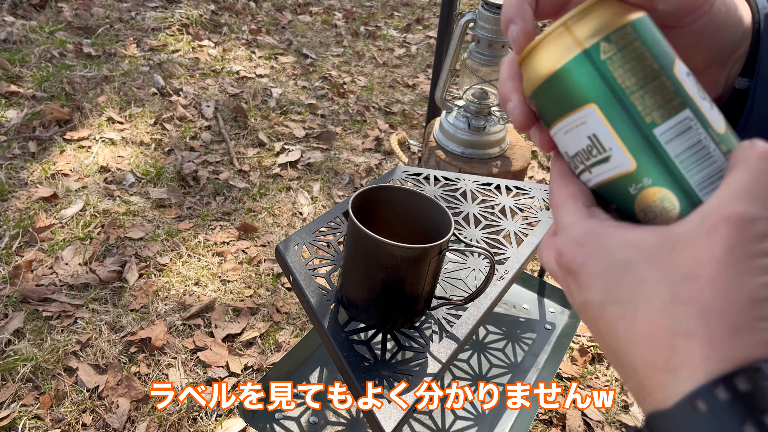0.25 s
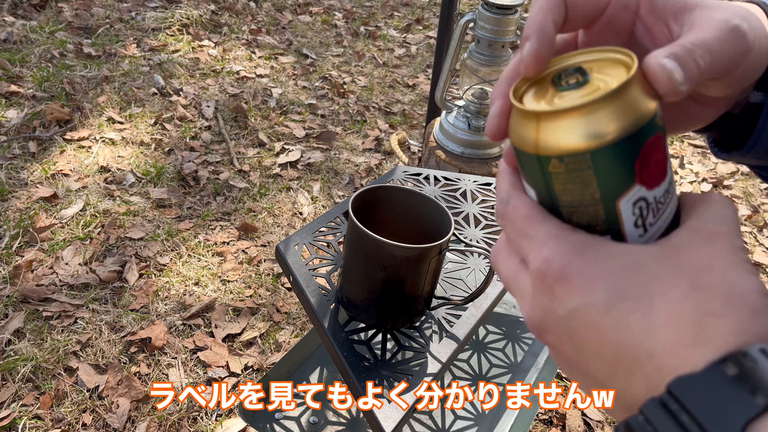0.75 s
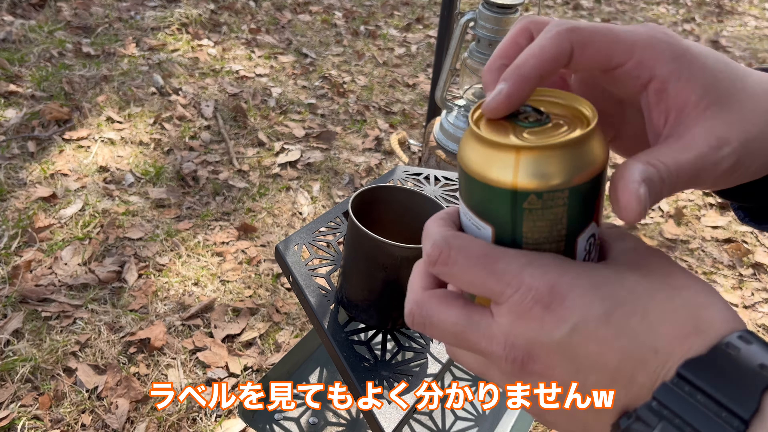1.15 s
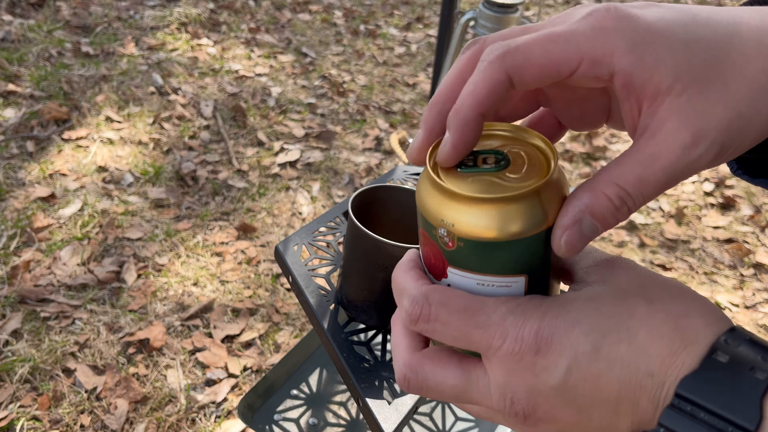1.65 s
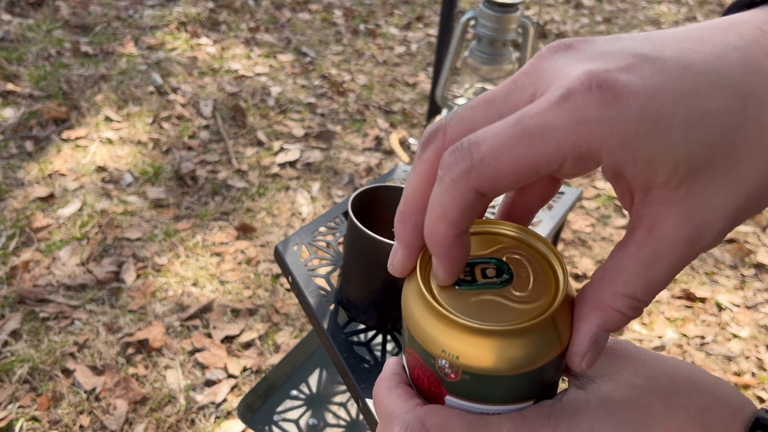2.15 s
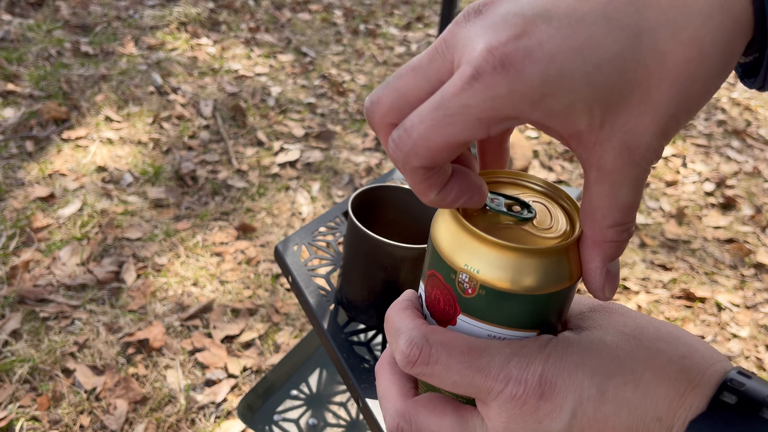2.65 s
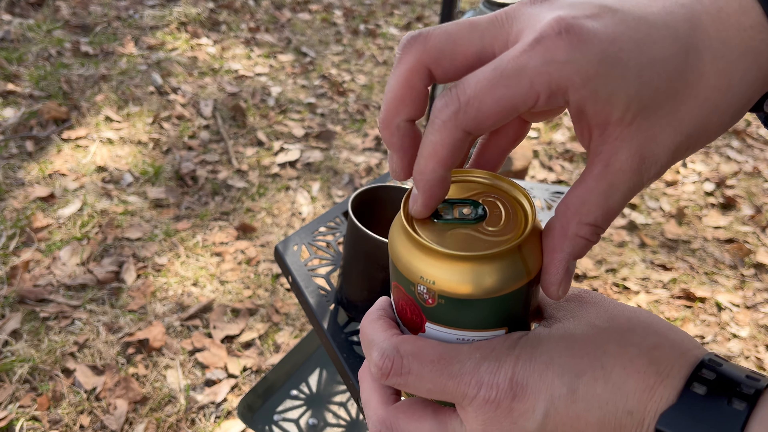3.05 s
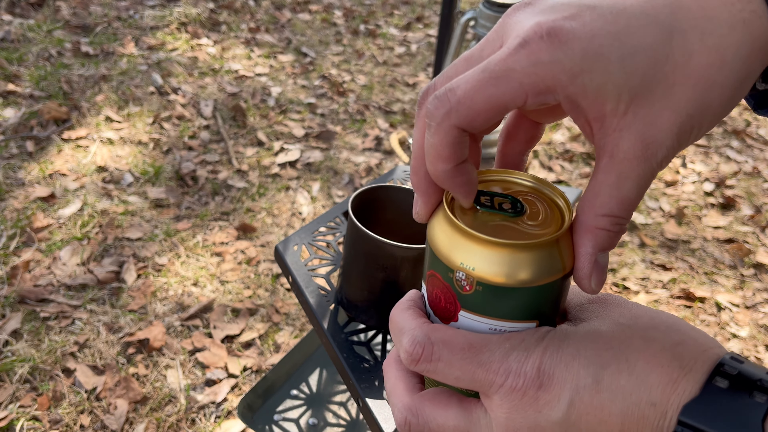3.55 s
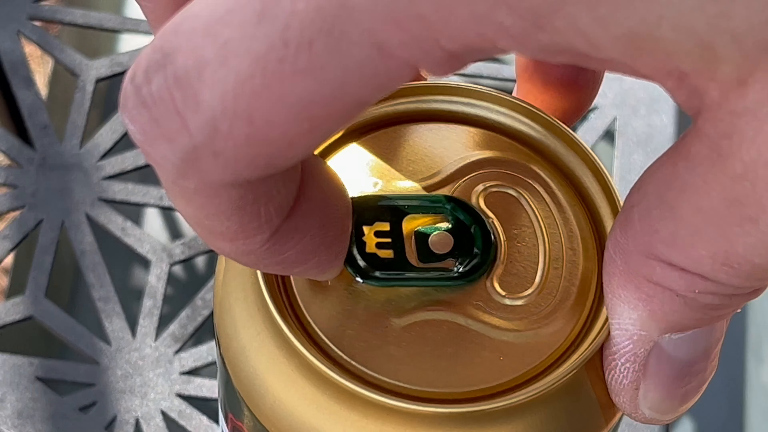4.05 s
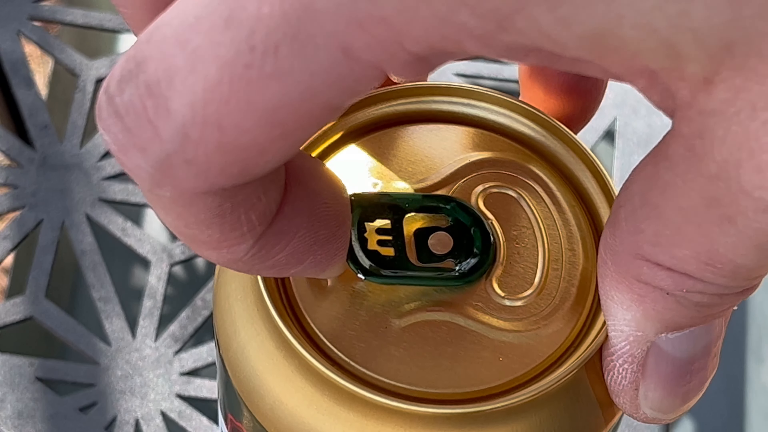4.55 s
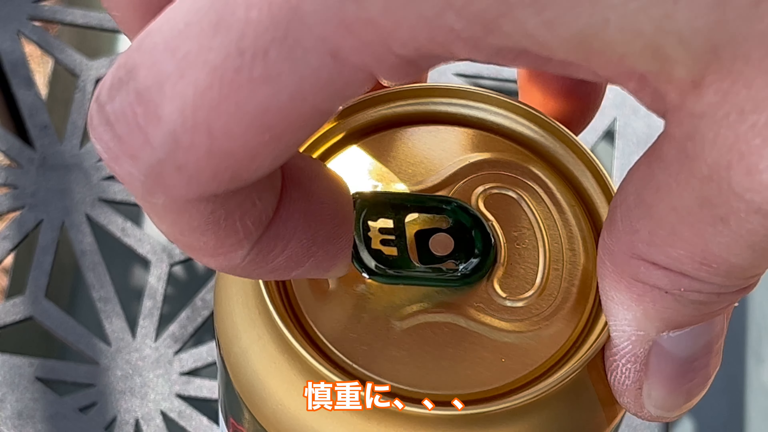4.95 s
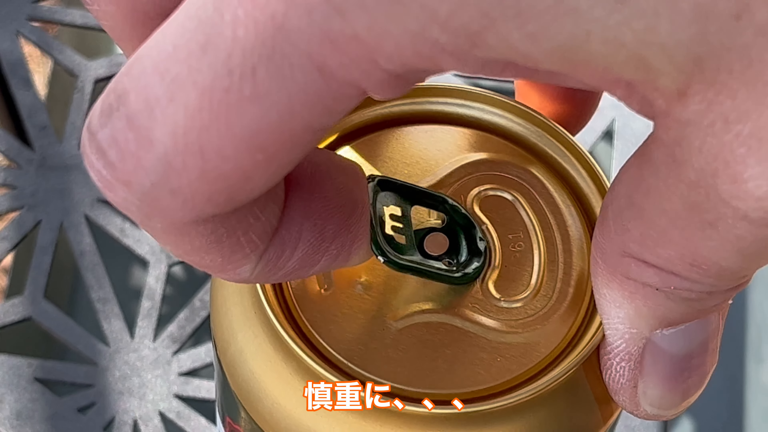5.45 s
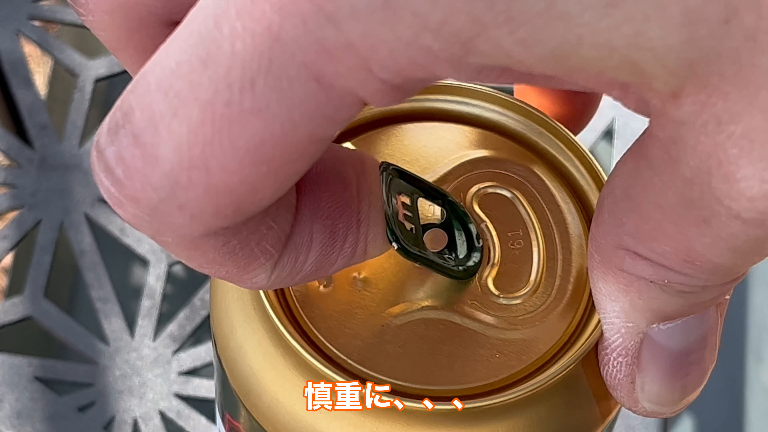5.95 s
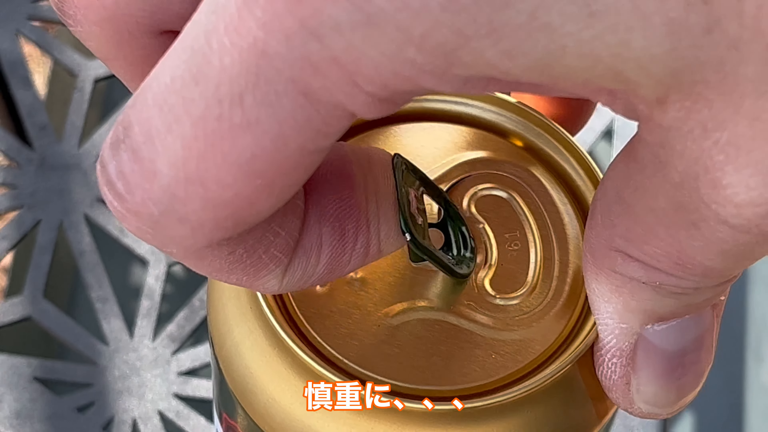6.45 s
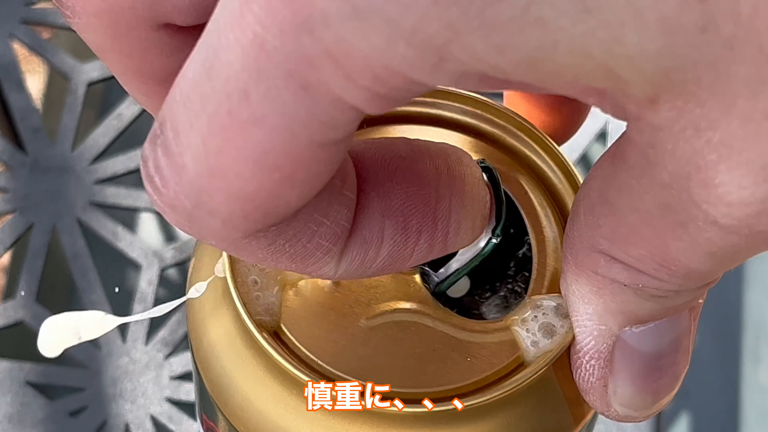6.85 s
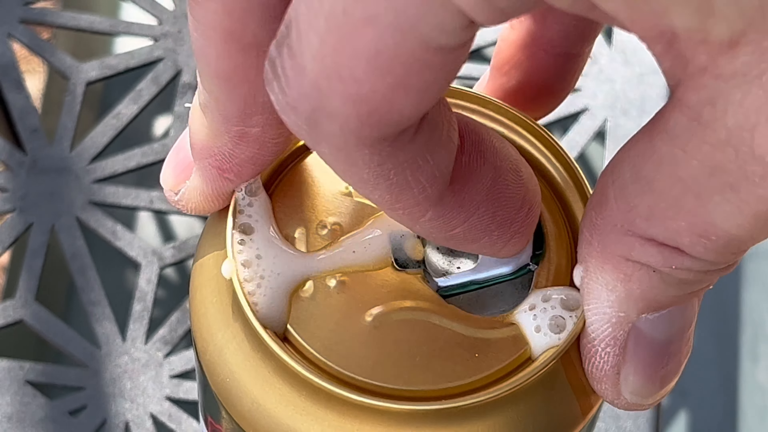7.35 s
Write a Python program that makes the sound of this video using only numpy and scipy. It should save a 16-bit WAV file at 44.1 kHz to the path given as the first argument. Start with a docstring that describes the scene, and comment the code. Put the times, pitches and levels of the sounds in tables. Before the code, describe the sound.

Quiet handling of a full drinks can: dry bright finger wipes, small scrapes, light tab ticks and thin cloth squeaks, over soft low air rumble and a barely audible leaf hiss. After a pause comes a hard metallic crack and very short bright hiss, small bubbly gulps, then a double snap tearing the lid open with a pop of gas. Wet fizz and little gurgles fade. Close stereo microphone, dry open air.

```python
"""The lid of a beer can cracks and tears in three snaps: struck metal modes, a buckling panel and a pop of gas.
Gas escapes as sputtering noise; bubbles and foam excite the air in the neck; the thin wall rings on.
Beforehand a nail ticks at the lid and tab. Fingers rub and scrape the can by stick and slip.
A sleeve swishes and squeaks as gliding narrow bands of noise.
Behind lie soft buffets of air, a low outdoor rumble and a faint hiss of leaves, all shaped noise or slow tones."""
import sys
import numpy as np
from scipy import signal
from scipy.fft import rfft, irfft, next_fast_len
from scipy.io import wavfile
from scipy.ndimage import uniform_filter1d, minimum_filter1d

SR = 44100
rng = np.random.default_rng(int(sys.argv[2]) if len(sys.argv) > 2 else 0)


def dump(signal):
    """Clip the signal to [-1, 1] and save it as 16-bit WAV at the path in sys.argv[1]."""
    limited = np.clip(np.atleast_2d(signal).T, -1, 1)
    pcm = np.round(limited * 32767).astype(np.int16)
    wavfile.write(sys.argv[1], SR, pcm)


N = 356769
T = np.arange(N) / SR  # time, s
TOP_HZ = 15900  # upper edge of the whole sound

# Skin and sleeve slide over the can: start_s, end_s, level_db, top_db
SLIDES = [(0, 0.207, -74, -72), (0.35, 0.817, -79, -69), (0.87, 1.164, -65, -61.5), (1.14, 1.56, -68, -65),
          (1.52, 2.253, -67, -73), (1.93, 1.992, -73, -82), (2.18, 2.544, -64.5, -71.5),
          (2.774, 2.862, -61, -66), (2.58, 2.72, -81, -86), (2.877, 3, -68, -71),
          (2.99, 3.463, -83.5, -87.5), (3.658, 3.76, -70.5, -72), (4.01, 4.099, -71.5, -76.5),
          (4.975, 5.073, -68, -77), (6.97, 7.118, -68, -76), (7.479, 7.59, -73.5, -79.5),
          (7.774, 7.873, -76.5, -84)]
SLIDE_ATTACK_S, SLIDE_SAG_DB_PER_S, SLIDE_RELEASE_T60_S = 0.091, 2, 0.26
GRIP_DB = -86.5  # the holding hands never lie quite still
# Quick bright wipes of the fingers as they turn the can: time_s, level_db
WIPES = [(.165, -60.5), (.262, -60), (.356, -60.5), (.456, -58), (.637, -55), (.727, -55.5), (.785, -56.5),
         (1.24, -54.5), (1.285, -58), (2.31, -61.5)]
WIPE_RISE_S, WIPE_FALL_S = 0.0124, .026  # Gaussian spreads: a wipe catches quickly and trails off
WIPE_BODY_DB = -15.5  # its body against its top
# Colour of the body of the rubbing: frequency_hz, gain_db
RUB_BODY = [(300, 8), (700, -1), (1200, -2.5), (2500, -0.5), (4000, -0.5), (6000, -2), (8000, -3),
            (10000, -20), (16000, -34.5)]
# Colour of the top of the rubbing: frequency_hz, gain_db
RUB_TOP = [(5000, -24), (8000, -6), (9500, -1.5), (11000, -4), (13000, -6), (15000, -9.5), (16000, -21)]
# Resonances of the gripped wall: frequency_hz, width_hz, relative_db
RUB_MODES = [(1150, 88, -5), (1480, 42, -5), (2230, 170, -7), (2750, 300, -8), (3550, 190, -5),
             (4840, 400, -4.5), (5760, 400, -3.5)]

# Spectrum of the outdoor rumble: frequency_hz, gain_db
AIR = [(15, -46), (25, -18), (43, 0.5), (97, 4), (136, -8), (251, -25), (281, -26.5), (375, -39.5),
       (409, -33), (452, -43.5), (500, -36.5), (650, -67), (1100, -120)]
# Slow drift of the outdoor level: time_s, level_db
AIR_LEVEL = [(0, -57.5), (2, -55.5), (3.6, -58.5), (4.9, -55.5), (5.5, -62), (6.1, -60), (7.7, -57.5),
             (8.09, -58.5)]
# Spectrum of the leaves: frequency_hz, gain_db
LEAVES = [(150, -3.5), (250, 14.5), (500, 8), (1000, 3.5), (2000, 1), (4000, -12.5), (7000, -34),
          (12000, -31), (15000, -15)]
# The rumble dips by as much as a snap exceeds this level, then returns
DIP_FROM_DB, DIP_RECOVERY_DB_PER_S = -17.5, 24.5

# A fingertip catches and scrapes, ringing the spot it touches: centre_s, half_length_s, level_db, pitch_hz
SCRAPES = [(1.075, 0.068, -70, 1140), (1.272, 0.051, -65, 6100), (1.402, 0.032, -70.5, 5800),
           (1.615, 0.015, -70, 4200), (1.72, 0.034, -73, 2480), (1.87, .012, -69, 2400),
           (1.978, .013, -66, 1970), (1.98, .012, -67, 3700), (1.99, .024, -64, 2680),
           (2.163, 0.012, -63, 3260), (2.24, 0.095, -69.5, 2580), (2.362, 0.1, -75.5, 1200),
           (2.46, .04, -71.5, 2700), (2.849, 0.0092, -54, 2570), (3.484, 0.015, -76, 2450),
           (3.486, 0.0093, -74.5, 6240), (3.76, 0.023, -73, 2500), (4.097, .025, -85, 2400),
           (7.58, 0.032, -75, 2640), (7.86, 0.023, -72.5, 2850), (7.95, 0.03, -81, 2850),
           (8.069, .02, -78.5, 2930)]
SCRAPE_WIDTH_HZ = 720  # of the first of two resonators

# The sleeve swishes: centre_s, half_length_s, level_db
SWISHES = [(1.08, .12, -72), (1.72, .17, -73), (2.2, .1, -71), (2.46, .085, -70), (2.95, .15, -80)]
# Colour of the cloth: frequency_hz, gain_db
SWISH_COLOUR = [(120, -6), (300, 2), (700, 0), (1400, 0), (2000, -9), (4000, -12), (7000, -17),
                (12000, -32)]
SWISH_LAG_S = .00036  # the sleeve is well off to one side: the left port hears it later

# Soft buffets of air and hands on the phone: time_s, relative_level_db, centre_pitch_hz
BUFFETS = [(1.579, -46, 80.3), (1.775, -51, 74.6), (4.215, -33.5, 88), (4.25, -47, 75.5),
           (4.424, -46, 57.9), (4.728, -40, 79.6), (4.775, -45.5, 51.9), (5.34, -47.5, 72),
           (5.425, -53.5, 74.9), (5.595, -49, 79.5), (5.634, -50, 61.7), (5.972, -49.5, 85),
           (6.015, -55.5, 180.4), (6.108, -52.5, 80.6), (6.226, -47, 104.5), (6.436, -50, 214.2),
           (7.751, -41, 159.1), (7.765, -46.5, 71.4), (7.82, -49, 54.5)]
BUFFET_CYCLES = 1.13  # cycles in the fall of a buffet: the deeper, the longer
BUFFET_RISE = 0.29  # its rise against its fall

# The sleeve squeaks, one curve for each move of the arm: time_s, pitch_hz, lower_line_db, upper_line_db
SQUEAKS = [
    [(1.84, 5350, -86, -94), (1.92, 5250, -77, -84), (2.02, 5100, -77, -79), (2.15, 4810, -82, -79),
     (2.29, 4950, -78, -88), (2.335, 5360, -68, -81), (2.365, 5450, -66, -80), (2.383, 5170, -68, -82),
     (2.4, 5430, -67, -81), (2.445, 5320, -65, -78), (2.47, 5150, -70, -79), (2.515, 4980, -72, -77),
     (2.54, 5010, -73, -75), (2.63, 4620, -83, -78), (2.69, 4530, -86, -80), (2.72, 4400, -93, -98)],
    [(2.96, 5280, -88, -98), (3.07, 5020, -83, -94), (3.17, 4900, -86, -97), (3.27, 4970, -96, -105)],
    [(3.62, 6700, -94, -120), (3.72, 6880, -87, -120), (3.8, 6500, -94, -120)],
    [(3.87, 6550, -93, -120), (3.95, 6770, -86, -120), (4.01, 7000, -94, -120)],
]
SQUEAK_UPPER_RATIO = 1.2  # pitch of the upper line against the lower
SQUEAK_SECOND_RATIO = 1  # a second strand at the lower pitch that follows the upper line's level
SQUEAK_WIDTH_HZ = 85  # of the first of two resonators

# Nail and tab tick on the lid: time_s, relative_level_db, low_db, treble_db
TICKS = [(1.864, -58.5, 4, -6), (2.155, -57, -21, -3), (2.510, -51, -4, 15), (2.715, -64, 0, -9),
         (2.847, -34, -10, 6), (2.857, -34.5, -3, -7), (2.921, -45, -12, -5), (2.971, -55.5, -3, -10),
         (4.951, -65.5, 4.5, -16.5), (5.327, -68, -7, -8), (5.367, -68, 0, -10), (5.382, -65.5, 3, -10),
         (5.494, -71, -9, -10), (5.603, -69.5, -10, -18), (5.715, -63, -8, -10), (5.727, -46, -12, -13.5),
         (5.8071, -34, -9, -13.5), (5.812, -38, -6, -15), (5.8182, -49, -7, -3), (5.826, -50.5, -7, -4),
         (5.895, -61, -6, -6), (5.902, -53, -7, -6), (5.916, -58.5, -8, -6), (5.937, -53.5, 3, -7),
         (6.099, -50, -5, -2.5), (6.12, -64, -8, 0), (6.215, -65.5, -7.5, 0.5), (6.320, -47, -9, 0),
         (6.385, -50.5, -12, 1.5), (6.392, -44, -12.5, 0.5), (6.405, -37, -6, 0.5), (6.408, -28, -7, -1),
         (6.4205, -43.5, -9, -2), (6.450, -28, -11.5, -5.5), (6.722, -45.5, -11.5, -1.5),
         (6.7493, -42, -4, -14), (6.982, -66, -10, 2), (7.048, -46.5, -10.5, -14), (7.083, -56, -12, -1),
         (7.112, -48.5, -12, 5), (7.165, -64, 8, -2), (7.281, -51.5, -10, 2.5), (7.444, -68, -6, -2),
         (7.469, -53, 2, -9), (8.049, -61.5, -15, -2)]
TICK_T60_S, TICK_RISE_S = 0.025, .0002
TICK_TOP_DB = -4  # its top against its treble
# Modes of the flat tab, plucked: frequency_hz, relative_db, t60_s
TAB = [(930, -10, .2), (1480, 7, .045), (2380, 14, .025), (2640, 5, .063), (4380, 2, .055)]
TAB_LIFTED_S = 4.3  # ticks before this time also ring the tab
# The lid gives way: time_s, level_db, panel_hz, panel_t60_s, low_db, upper_db, top_db, wall_ring_db, gas_pop_db
SNAPS = [(5.0831, -12, 4340, 0.00092, -11.5, -5.5, -8.5, 5, -22),
         (6.4285, -10.5, 4040, 0.0048, -4.5, 6, -1, -7.5, -22.5),
         (6.7604, -5.5, 3617, 0.007, -1, -7.5, -9.5, -5, -2.5)]
# Modes of the struck lid: frequency_hz, relative_db, t60_s
LID = [(1182, -13, 0.0019), (1966, -1, 0.0062), (2560, -2, 0.0046), (3380, -3, 0.0043), (4130, -5, .009),
       (4620, -3, 0.0062), (5050, 4, 0.0021), (5710, 1, 0.0073), (6250, 1, 0.0042), (7270, -3, 0.0058),
       (8277, -15.5, 0.008), (10860, 2, 0.0059), (11650, 1.5, 0.0019), (12340, -5.5, 0.0056),
       (14400, -11, 0.0047)]
REBOUND_S, REBOUND_DB = 0.0033, -23  # the lid springs back once after each snap, and its panel rings again
# A thin tone swells up and stops as each snap begins: end_s, pitch_hz, level_db, swell_t60_s
SWELLS = [(5.082, 1663, -36, 0.035), (6.761, 1660, -24.5, 0.12)]

# Wall modes still under pressure at the first crack; close pairs beat: frequency_hz, level_db, t60_s
TAUT_RING = [(835, -68, .6), (2046, -61, .3), (2304, -53, .25), (2660, -46.5, 0.3), (2695, -50, .26),
             (3165, -57, .22), (4237, -58, .33), (4317, -60, .33), (4610, -56, .35), (4650, -52.5, .45),
             (4640, -53.5, .58), (4845, -53, .27), (5841, -54, .2)]
# Long rings of the can wall: frequency_hz, relative_db, t60_s
SHELL = [(520, -7.5, 0.45), (715, -7.5, .18), (1240, -11, .22), (1674, -8, .2), (1863, -20, .3),
         (2590, -2, .28), (2622, -3, .28), (2634, -1, .3), (2930, -9, .2), (3162, -10, .3),
         (3220, -15, .45), (3770, -9, .22), (3820, -16, .3), (4145, -18, .35), (4231, -21, .4),
         (4441, -16, .3), (4802, -16, .45), (4880, -11, .25), (5077, -8, .24), (6024, -10, .17),
         (6261, -12, .25)]
# Colour of the wall's crowded modes: frequency_hz, gain_db
SHELL_WASH = [(200, -17.5), (600, -8.5), (1500, 7), (3000, -1.5), (5000, 3.5), (8000, 9.5), (12000, 2),
              (16000, -13.5)]
SEALED_DB = -16  # drive of the clear wall modes before the last snap
WALL_WANDER = .65  # phase wander, radians
WALL_WANDER_RATE = 55  # times a second that the shifting beer and grip retune the wall

# The first jet of gas opens, sags as the pressure drops and is pinched off; its top starts once the crack is wide
JET_START_S, JET_WHISTLE_S, JET_END_S = 5.082, 5.092, 5.141
JET_DB, JET_TOP_DB, JET_SAG_DB_PER_S = -33.5, -24.5, 120
JET_ATTACK_S, JET_RELEASE_T60_S = .017, .1
JET_WHISTLE_ATTACK_S, JET_WHISTLE_RELEASE_T60_S = 0.005, .045
# Colour of the body of the jet: frequency_hz, gain_db
JET_BODY = [(150, -5.5), (400, -5), (700, -14), (1200, -17.5), (2400, -2.5), (4000, -4.5), (5600, 8),
            (7500, -1), (10000, -8.5), (16000, -20.5)]
# Colour of the whistling top of the jet: frequency_hz, gain_db
JET_TOP = [(6000, -43.5), (9000, -13.5), (10800, -7.5), (11700, 1.5), (13100, -5), (14500, -9), (16000, -9)]

# Each rush of gas leaves foam that fizzes away on the lid: start_s, relative_level_db, sag_db_per_s
FOAM = [(5.15, -70.5, 76), (5.751, -73.5, 41.5), (6.769, -52, 90), (6.95, -81.5, 9.5)]
# Colour of the fizz: frequency_hz, gain_db
FOAM_COLOUR = [(500, -3.5), (1200, -2.5), (1700, 2), (2250, 0), (2700, 8.5), (3100, 2), (3600, 1),
               (4800, 1), (5500, -3.5), (7500, -5.5), (11500, -7), (15000, -13)]
FOAM_ATTACK_S = .02
# Foam churns in the neck between the gulps: start_s, end_s, level_db, sag_db_per_s
CHURNS = [(5.749, 6.38, -67.5, 5.5), (6.994, 8.09, -77, 5)]
# Resonances of the air in the neck: frequency_hz, width_hz, relative_db
HEADSPACE = [(703, 20, -0.5), (767.6, 20, -7), (829, 13, 1), (859, 11, 2.5), (920, 20, -5.5),
             (980, 26, -4.5)]

# Bubbles of gas gulp through the slit: time_s, relative_level_db, bubble_pitch_hz, puff_t60_s
GULPS = [(5.735, -58, 960, 0.31), (5.841, -58, 910, .14), (5.931, -60.5, 820, 0.081),
         (5.96, -55.5, 950, 0.16), (6.046, -54.5, 867, 0.1), (6.091, -66, 940, 0.062),
         (6.127, -62.5, 900, 0.17), (6.23, -58.5, 850, 0.13), (6.334, -57.5, 966, 0.25),
         (7, -60.5, 760, 0.091), (7.057, -63, 745, .12), (7.107, -64.5, 718, .1), (7.167, -59, 736, 0.15),
         (7.243, -64, 790, .11), (7.361, -69, 860, 0.065), (7.47, -62.5, 794, 0.079),
         (7.594, -62.5, 856, 0.14), (7.685, -70.5, 955, 0.076), (7.771, -69, 828, 0.21),
         (7.845, -64, 867, 0.29), (7.971, -73.5, 840, 0.23)]
BUBBLE_WIDTH_HZ = 330  # of each of two resonators
NECK_HZ, NECK_WIDTH_HZ = 2830, 260  # the upper resonance of the slit; width of the first of two resonators
GUSH_S, GUSH_DB, GUSH_HZ, GUSH_T60_S = 6.763, -36, 837, .27  # the gush after the last snap, a large gulp
GUSH_CHURN_DB, GUSH_CHURN_T60_S = -19, .7  # the churning that it stirs up, against the gush

# The two microphone ports as seen from the can: frequency_hz, left_lead_rad, left_minus_right_db
PORTS = [(200, .2, 1), (800, .3, 3), (1100, .2, -1), (1300, .8, -3.5), (1500, 1.2, -5), (1750, -.2, -5),
         (2200, .2, -2.5), (2900, .55, -1), (4740, .3, 0), (5600, -.85, 0), (6700, -1.2, 0),
         (8400, -3.14, 0), (10000, -4.7, 0), (11700, -6.28, 0), (13000, -7.1, 0), (15300, -9.1, 0)]


def undb(db):
    """Decibels to an amplitude ratio."""
    return 10 ** (np.asarray(db) / 20)


def unit(x):
    """Normalise to rms 1."""
    return x / np.sqrt(np.mean(x ** 2) + 1e-30)


def noise(size=N):
    """White noise: equal mean power at all frequencies."""
    return rng.standard_normal(size)


def walk(rate):
    """Smooth chance: normal random values, rate of them a second, joined by lines."""
    knots = noise(size=16384)
    return np.interp(T * rate, np.arange(len(knots)), knots)


def grains(rate, spread_db):
    """Shot noise: sparse random clicks of uneven size, rate of them a second on average."""
    struck = rng.random(N) < rate / SR
    size_db = spread_db * np.minimum(rng.exponential(size=N), 4)
    return unit(struck * noise() * undb(size_db))


def curves(rows):
    """Linear interpolation of each column of a table through time."""
    s, *columns = np.transpose(rows)
    return [np.interp(T, s, c) for c in columns]


def fade(t, t60):
    """Exponential decay from t = 0 by 60 dB in t60, silent before."""
    return (t >= 0) * np.exp(-np.log(1000) * np.clip(t / max(t60, 1e-4), 0, 5))


def envelope(start, end, db, sag_db_per_s, attack_s, release_t60):
    """Linear rise, steady sag in dB, exponential release."""
    t = np.maximum(T - start, 0)
    attack = np.minimum(t / max(attack_s, 1e-4), 1)
    return undb(db - sag_db_per_s * t) * attack * fade(np.maximum(T - end, 0), release_t60)


def add(track, s, x):
    """Superpose x on the track at s seconds."""
    i = int(s * SR)
    track[i:i + len(x)] += x[:N - i]


def colour(x, points, size=4096):
    """Minimum-phase filter through frequency_hz, gain_db points, built by folding the cepstrum."""
    hz, db = np.transpose(points)
    bins = np.log(np.fft.rfftfreq(size, 1 / SR) + 1)
    cepstrum = irfft(np.log(undb(np.interp(bins, np.log(hz), db))))
    cepstrum[1:size // 2] *= 2
    cepstrum[size // 2 + 1:] = 0
    return signal.fftconvolve(x, irfft(np.exp(rfft(cepstrum))))[:len(x)]


def resonate(x, hz, width):
    """One two-pole resonance, gain 1 at its centre."""
    return signal.lfilter(*signal.iirpeak(hz, hz / width, SR), x)


def drifting(x, hz, width):
    """Resonance with a moving centre: shift the curve hz to zero, low-pass, shift back."""
    turn = np.exp(2j * np.pi * np.cumsum(hz) / SR)
    pole = np.exp(-np.pi * width / SR)
    return 2 * np.real(turn * signal.lfilter([1 - pole], [1, -pole], x / turn))


def ring(t, modes):
    """Modal sum: decaying sines, neighbours in opposite sense."""
    return sum((-1) ** k * undb(db) * fade(t, t60) * np.sin(2 * np.pi * hz * t)
               for k, (hz, db, t60) in enumerate(modes))


def hands(grip_db=5, modes_db=6, drift=0.055, catch_db=1.28):
    """Stick-slip friction in countless tiny steps; the shifting grip frees, damps and retunes the wall."""
    body_gain, top_gain = undb(GRIP_DB), undb(GRIP_DB - 5.5)
    # independent rubs add by power
    for start, end, db, top_db in SLIDES:
        slide = envelope(start, end, 0, SLIDE_SAG_DB_PER_S, SLIDE_ATTACK_S, SLIDE_RELEASE_T60_S)
        body_gain = np.hypot(body_gain, undb(db) * slide)
        top_gain = np.hypot(top_gain, undb(top_db) * slide)
    for s, db in WIPES:
        spread_s = np.where(T < s, WIPE_RISE_S, WIPE_FALL_S)
        wipe = undb(db) * np.exp(-.5 * ((T - s) / spread_s) ** 2)
        body_gain = np.hypot(body_gain, undb(WIPE_BODY_DB) * wipe)
        top_gain = np.hypot(top_gain, wipe)
    fine = grains(rate=12000, spread_db=-2.0)
    coarse = undb(-7) * grains(rate=260, spread_db=-1)
    slips = colour(fine + coarse, RUB_BODY)
    body = slips.copy()
    for hz, width, mode_db in RUB_MODES:
        gain = undb(modes_db + mode_db + grip_db * walk(13))
        body += gain * drifting(slips, hz * np.exp(drift * walk(6)), width)
    # the grip shifts the colour, not the level
    body = body / np.sqrt(uniform_filter1d(body ** 2, size=4096) + 1e-18)
    top = unit(colour(grains(rate=9300, spread_db=-1.0), RUB_TOP))
    return (body * body_gain + top * top_gain) * undb(catch_db * walk(35))


def dip():
    """Level drop of the rumble after the snaps, in dB, recovering linearly."""
    drops = [(T > s) * np.maximum(db - DIP_FROM_DB - DIP_RECOVERY_DB_PER_S * (T - s), 0)
             for s, db, *_ in SNAPS]
    return np.max(drops, axis=0)


def wide(points, side_db):
    """Mid and side noise of one colour: the side part enters the two ports in opposite sense."""
    side = np.array([[1], [-1]]) * unit(colour(noise(), points))
    return unit(colour(noise(), points)) + undb(side_db) * side


def outdoors(rumble_db=3, drone_db=-7, drone_hz=93, low_mid_db=-11, leaves_db=-80, side_db=-13):
    """Far rumble, nearly alike at both ports, with a noise-driven wavering drone under a faint wide hiss."""
    db = curves(AIR_LEVEL)[0] - dip()
    rumble = undb(rumble_db) * wide(AIR, side_db)
    drone = undb(drone_db) * unit(resonate(resonate(noise(), drone_hz, 16), drone_hz, 16))
    low_mid = [(80, -16.5), (170, 5.5), (280, -2.5), (450, -14.0), (900, -28.0), (3000, -53.5)]
    wind = undb(db + low_mid_db) * wide(low_mid, -7.5)
    leaves = undb(leaves_db + 0.91 * walk(3.9)) * wide(LEAVES, 1.5)
    return undb(db) * (rumble + drone) + wind + leaves


def scrapes(slip_rate=1500, spread_db=1):
    """Stick-slip in short rough runs, each through one broad resonance of the wall."""
    slips, out = grains(rate=slip_rate, spread_db=spread_db), np.zeros(N)
    t = T[:SR // 3] - 1 / 6
    for s, half, db, hz in SCRAPES:
        run = np.roll(slips, -int(s * SR))[:len(t)]
        run = unit(resonate(resonate(run, hz, SCRAPE_WIDTH_HZ), hz, 2 * SCRAPE_WIDTH_HZ))
        add(out, s + t[0], undb(db) * np.exp(-.5 * (t / half) ** 2) * run)
    return out


def sleeve(flutter_db=1.8, diffuse_db=-6):
    """Friction of cloth beside the phone: grain noise swells with each move and reaches the left port late."""
    level = sum(undb(db) * np.exp(-.5 * ((T - s) / half) ** 2) for s, half, db in SWISHES)
    level = level * undb(flutter_db * walk(28))
    swish, spread = (unit(colour(grains(rate=3000, spread_db=1), SWISH_COLOUR)) for _ in range(2))
    direct = np.array([np.interp(T - SWISH_LAG_S, T, swish), swish])
    diffuse = undb(diffuse_db) * np.array([[1], [-1]]) * spread
    return level * (direct + diffuse)


def buffets(push_db=6, sag=0.096, wander=0.21):
    """Slow pressure pulses: a few uneven cycles of sinking pitch each, with a deeper part below."""
    t = T[:SR // 3] - 1 / 6
    out = np.zeros(N)
    for s, db, hz in BUFFETS:
        half = BUFFET_CYCLES / hz
        pitch = hz * np.exp(-sag * np.tanh(t / half) + wander * walk(90)[:len(t)])
        turns = np.cumsum(pitch) / SR
        push = np.sin(2 * np.pi * turns) + undb(-2.0) * np.sin(2 * np.pi * 0.92 * turns)
        swell = np.exp(-.5 * (t / half / np.where(t < 0, BUFFET_RISE, 1)) ** 2)
        add(out, s + t[0], undb(db + push_db) * swell * push)
    return out


def squeaks(waver=.007, second_db=-3, pan_db=6):
    """Frictional singing of the weave: narrow strands of noise that glide together as the arm moves."""
    out = np.zeros(N)
    wobble = np.exp(waver * walk(70))
    for stroke in SQUEAKS:
        moving = (T > stroke[0][0]) & (T < stroke[-1][0])
        hz, lower_db, upper_db = (c[moving] for c in curves(stroke))
        strands = [(1, lower_db), (SQUEAK_SECOND_RATIO, upper_db + second_db), (SQUEAK_UPPER_RATIO, upper_db)]
        for ratio, db in strands:
            pitch = ratio * hz * wobble[moving]
            strand = drifting(noise(size=len(hz)), pitch, SQUEAK_WIDTH_HZ)
            strand = drifting(strand, pitch, 2 * SQUEAK_WIDTH_HZ)
            out[moving] += undb(db) * unit(strand)
    return out * undb(np.array([[pan_db], [-pan_db]]) / 2)


def lid_blow(t, low_db, upper_db, top_db, scrape_t60, scrape_db, rise_s):
    """Impact on a plate: its modes ring while metal scrapes on briefly; energy equals 3 ms at rms 1."""
    scrape = noise(size=len(t)) * fade(t, scrape_t60)
    blow = (ring(t, LID) + undb(scrape_db) * scrape) * (1 - np.exp(-t / rise_s))
    points = [(300, low_db - 3.0), (1000, low_db), (2200, low_db), (3300, 0.00027), (4400, 0.012),
              (5500, upper_db), (8000, upper_db), (10500, top_db)]
    blow = colour(blow, points, size=512)
    return blow / np.sqrt(np.sum(blow ** 2) / (.003 * SR))


def lid(panel_db=0, swell_s=0.00063, tick_db=-3, tick_ring_db=-4, tab_db=-19, tear_db=-4):
    """Impact and buckling of a small plate, plus a thin tone that swells into the snaps; returns the direct
    sound and the force sent into the wall."""
    t = T[:SR // 6]
    direct, force = np.zeros(N), np.zeros(N)
    for s, db, low_db, treble_db in TICKS:
        tick = undb(db + tick_db) * lid_blow(t, low_db, treble_db, treble_db + TICK_TOP_DB,
                                             scrape_t60=TICK_T60_S, scrape_db=-3, rise_s=TICK_RISE_S)
        add(direct, s, tick + (s < TAB_LIFTED_S) * undb(db + tab_db) * ring(t, TAB))
        add(force, s, undb(tick_ring_db) * tick)
    # each swell is a decaying tone turned backwards
    t_swell = T[:int(.03 * SR)]
    for s, hz, db, t60 in SWELLS:
        onset = np.sin(np.linspace(0, np.pi / 2, len(t_swell)))
        add(direct, s - .03, ring(t_swell, [(hz, db, t60)])[::-1] * onset)
    for s, db, hz, t60, low_db, upper_db, top_db, ring_db, pop_db in SNAPS:
        # the panel inside the score line buckles and swings for a few cycles; freed gas pops
        panel = ring(t, [(hz, 0, t60)]) * (1 - np.exp(-t / swell_s)) ** 2
        panel = panel / np.abs(panel).max()
        pop = ring(t, [(1000, -1, 0.006), (1294, 6.0, 0.0048), (1700, 2.0, 0.0073)])
        pop = pop * (1 - np.exp(-t / 0.00061))
        tear = lid_blow(t, low_db, upper_db, top_db, scrape_t60=0.013, scrape_db=0.0, rise_s=0.000067)
        snap = undb(db) * (undb(tear_db) * tear + undb(panel_db) * panel + undb(pop_db) * pop)
        rebound = lid_blow(t, low_db=-14.0, upper_db=-11.5, top_db=-14.0,
                           scrape_t60=0.012, scrape_db=0.0, rise_s=0.00054)
        rebound = rebound + ring(t, [(hz, 4, 2 * t60)])
        add(direct, s, snap)
        add(direct, s + REBOUND_S, undb(db + REBOUND_DB) * rebound)
        add(force, s, undb(ring_db) * snap)
    add(direct, SNAPS[0][0], wall_ring(T[:SR], TAUT_RING))
    # so small a lid radiates almost no bass
    return signal.sosfilt(signal.butter(2, 260, "high", fs=SR, output="sos"), direct), force


def wall_ring(t, modes):
    """Modal decay whose phases wander, each by itself, as beer and fingers load the thin wall."""
    out = np.zeros(len(t))
    for hz, db, t60 in modes:
        wander = WALL_WANDER * walk(WALL_WANDER_RATE)[:len(t)]
        out += undb(db) * fade(t, t60) * np.sin(2 * np.pi * hz * t + wander)
    return out


def wall(force, modes_db=-52, wash_db=-48, wash_t60=0.17, treble_t60=0.098, split_hz=6000):
    """Impulse response of a thin shell: a few clear modes in a crowded wash whose treble dies first."""
    t = T[:SR // 2]
    wash = colour(noise(size=len(t)), SHELL_WASH)
    low = signal.sosfiltfilt(signal.butter(4, split_hz, fs=SR, output="sos"), wash)
    wash = low * fade(t, wash_t60) + (wash - low) * fade(t, treble_t60)
    # the clear modes are driven weakly until 10 ms before the last snap
    free = np.where(T < SNAPS[-1][0] - .01, undb(SEALED_DB), 1)
    clear = signal.fftconvolve(force * free, undb(modes_db) * wall_ring(t, SHELL))
    crowded = signal.fftconvolve(force, undb(wash_db) * wash)
    return (clear + crowded)[:N]


def jet(sputter_db=-1.5, cavity_t60=0.04, cavity_db=-27):
    """Turbulent flow: gas sputters through the crack; its top rings the crowded modes of the gas space."""
    cavity = undb(cavity_db) * noise(size=4096) * fade(T[:4096], cavity_t60)
    hiss = noise()
    top = unit(colour(hiss + signal.fftconvolve(hiss, cavity)[:N], JET_TOP))
    body = unit(colour(noise(), JET_BODY))
    flow = envelope(JET_START_S, JET_END_S, JET_DB, JET_SAG_DB_PER_S, JET_ATTACK_S, JET_RELEASE_T60_S)
    whistle = envelope(JET_WHISTLE_S, JET_END_S, JET_TOP_DB, JET_SAG_DB_PER_S,
                       JET_WHISTLE_ATTACK_S, JET_WHISTLE_RELEASE_T60_S)
    return undb(sputter_db * walk(1000)) * (flow * body + whistle * top)


def foam(fizz_db=-1, churn_attack_s=0.021, churn_release_t60=0.28, churn_flicker_db=3.0):
    """Shot noise of tiny bursting bubbles on the lid; foam churning inside keeps the neck resonating."""
    fizz = sum(envelope(s, T[-1], db, sag, FOAM_ATTACK_S, 1) for s, db, sag in FOAM)
    fizz = undb(fizz_db) * fizz * undb(2.5 * walk(45))
    bursts = unit(colour(grains(rate=900, spread_db=2.5), FOAM_COLOUR))
    bubbles = grains(rate=540, spread_db=2.5)
    neck = sum(undb(gain_db) * resonate(bubbles, hz, width) for hz, width, gain_db in HEADSPACE)
    neck = unit(colour(neck, [(300, -10.0), (650, 6.0), (1500, 1.5), (2800, 4.5), (6000, -8)]))
    churn = sum(envelope(start, end, db, sag, churn_attack_s, churn_release_t60)
                for start, end, db, sag in CHURNS)
    churn = churn + undb(GUSH_DB + GUSH_CHURN_DB) * fade(T - GUSH_S, GUSH_CHURN_T60_S)
    return fizz * bursts + churn * undb(churn_flicker_db * walk(30)) * neck


def gurgle(gulp_db=-2, burst_db=4, burst_t60=.025, bubble_db=-8, spit_db=-18, neck_db=-17):
    """Bubble and cavity resonance: each puff sounds at its own pitch, spits a little and rings the neck."""
    t = T[:SR // 2]
    out, gas = np.zeros(N), noise(size=N + SR)
    spit_colour = [(300, -10.5), (550, -2), (1400, 3), (2200, -0.5), (2850, 4.5), (3500, -9),
                   (6000, -12.5), (12000, -22.5)]
    for s, db, hz, t60 in [(GUSH_S, GUSH_DB, GUSH_HZ, GUSH_T60_S), *GULPS]:
        decay = fade(t, t60) + undb(burst_db) * fade(t, burst_t60)
        puff = gas[int(s * SR):][:len(t)] * decay * (1 - np.exp(-t / .002))
        bubble = resonate(resonate(puff, hz, BUBBLE_WIDTH_HZ), hz, BUBBLE_WIDTH_HZ)
        cavity = sum(undb(gain_db) * resonate(bubble, f, width) for f, width, gain_db in HEADSPACE)
        tone = undb(bubble_db) * bubble + cavity
        spit = colour(puff, spit_colour, size=512)
        neck = resonate(resonate(puff, NECK_HZ, NECK_WIDTH_HZ), NECK_HZ, 2 * NECK_WIDTH_HZ)
        parts = [(tone, 0), (spit, spit_db), (neck, neck_db)]
        # each part is levelled over its first 25 ms
        gulp = sum(undb(part_db) * x / np.std(x[:SR // 40]) for x, part_db in parts)
        add(out, s - .002, undb(db + gulp_db) * gulp)
    return out


def crackle(count=260, level_db=-72, spread_db=4, hz=3600, octaves=.55, t60=.016, rise_s=.0012, gush_db=12):
    """Free decay of larger bubbles that pop at random, each at its own pitch, most loudly in the gush."""
    seeping = sum(envelope(start, end, 0, sag, FOAM_ATTACK_S, .1) for start, end, _, sag in CHURNS)
    seeping = seeping + undb(gush_db) * fade(T - GUSH_S, .6)
    t, out = T[:SR // 20], np.zeros(N)
    first = CHURNS[0][0]
    for when, (pitch, louder) in zip(rng.random(count), rng.standard_normal(size=(count, 2))):
        pop_hz = min(hz * 2 ** (octaves * pitch), TOP_HZ)
        pop = ring(t, [(pop_hz, level_db + spread_db * louder, t60)])
        add(out, first + when * (T[-1] - first), pop * (1 - np.exp(-t / rise_s)))
    return seeping * out


def ports(x):
    """Near-field reception: the sound reaches the two ports with different phase and level."""
    size = next_fast_len(N + 4096)
    hz, lead, pan_db = np.transpose(PORTS)
    f = np.fft.rfftfreq(size, 1 / SR)
    half = np.exp(.5j * np.interp(f, hz, lead)) * undb(np.interp(f, hz, pan_db) / 2)
    return irfft(rfft(x, size) * np.array([half, 1 / half]), size)[:, :N]


def scene(jet_ring_db=-6, foam_ring_db=2):
    """Superposition of the can close by, whose wall gas and foam also drive, and the woods behind."""
    direct, force = lid()
    gas, froth = jet(), foam()
    ringing = wall(force + undb(jet_ring_db) * gas + undb(foam_ring_db) * froth)
    can = hands() + scrapes() + direct + ringing + gas + froth + gurgle() + crackle()
    return ports(can) + outdoors() + sleeve() + buffets() + squeaks()


def record(dry):
    """Peak limiting by one smoothed gain for both ports, then a steep low-pass at TOP_HZ."""
    gain = np.minimum(1, .92 / (np.abs(dry).max(axis=0) + 1e-9))
    gain = uniform_filter1d(minimum_filter1d(gain, size=33), size=33)
    return signal.sosfilt(signal.ellip(10, .2, 95, TOP_HZ, fs=SR, output="sos"), dry * gain)


dry = scene()
out = record(dry)
dump(out)
```